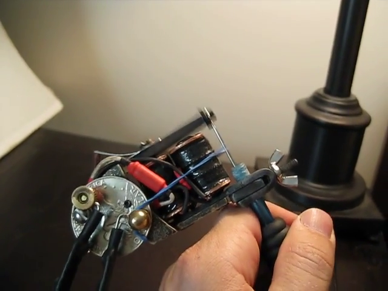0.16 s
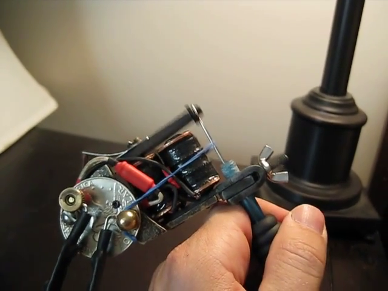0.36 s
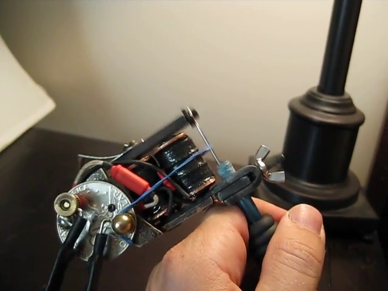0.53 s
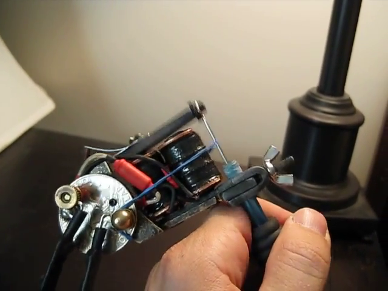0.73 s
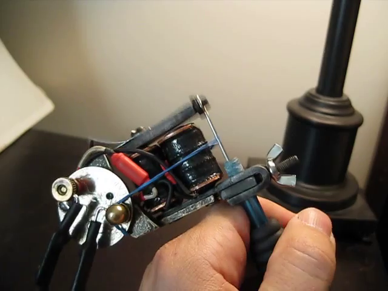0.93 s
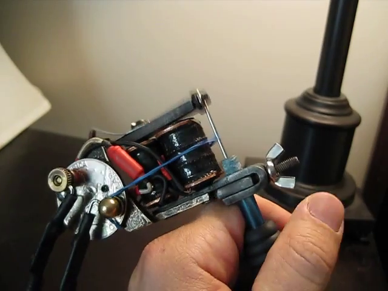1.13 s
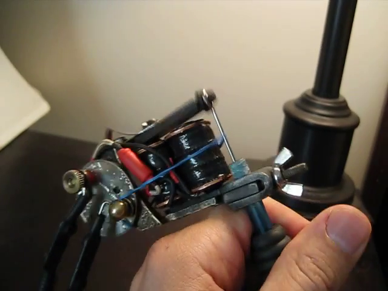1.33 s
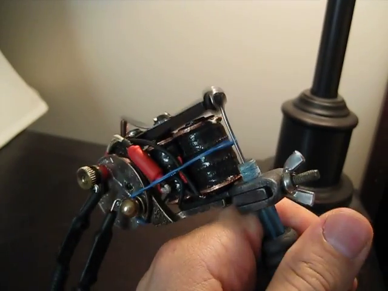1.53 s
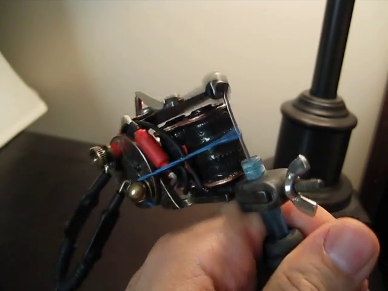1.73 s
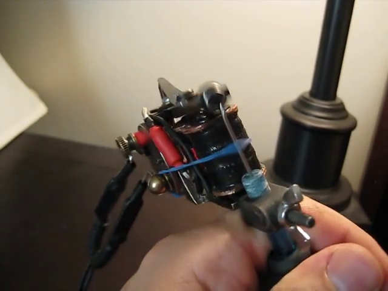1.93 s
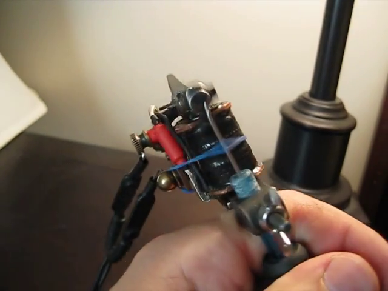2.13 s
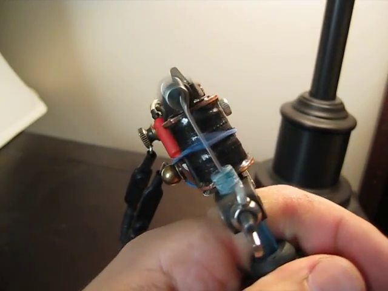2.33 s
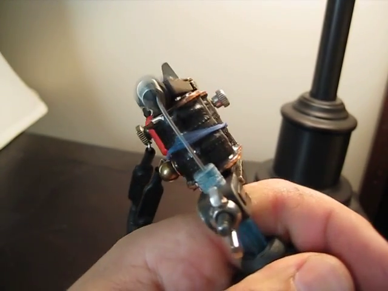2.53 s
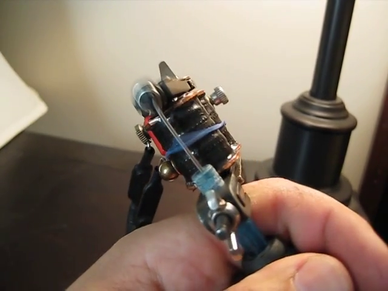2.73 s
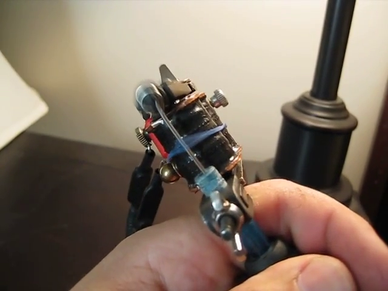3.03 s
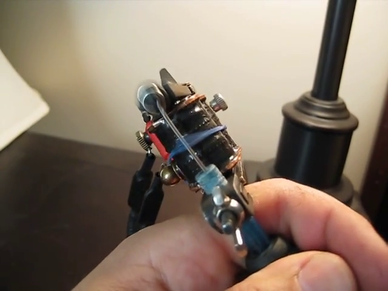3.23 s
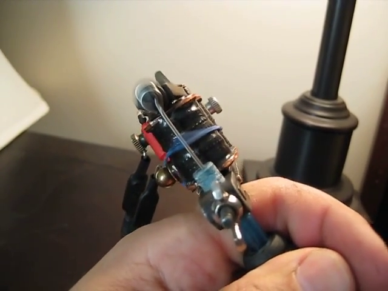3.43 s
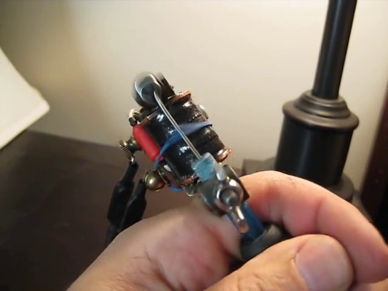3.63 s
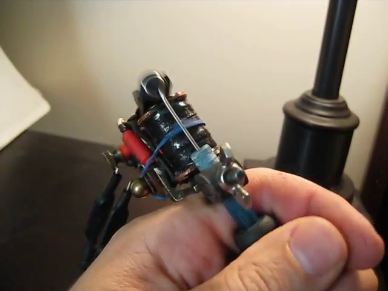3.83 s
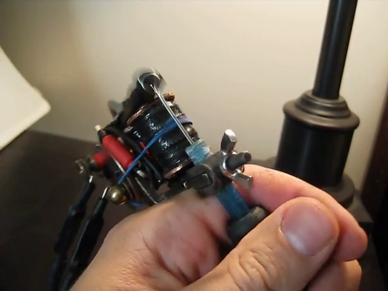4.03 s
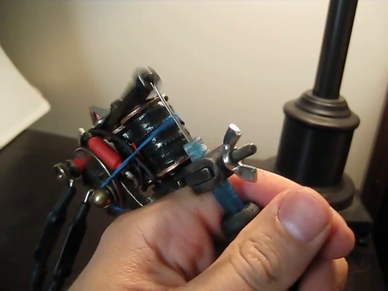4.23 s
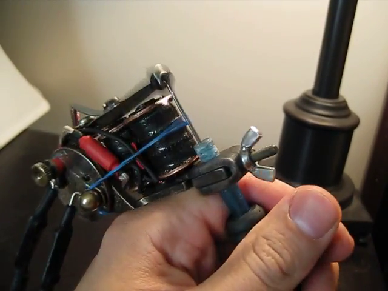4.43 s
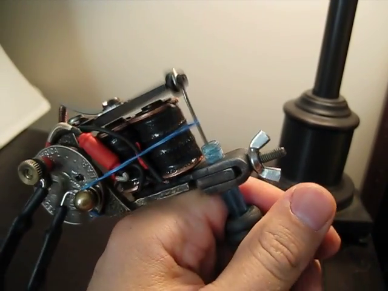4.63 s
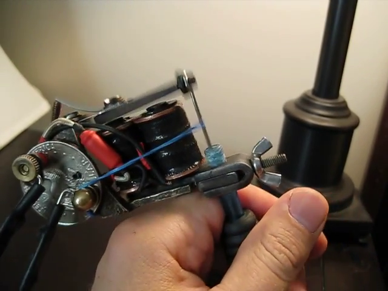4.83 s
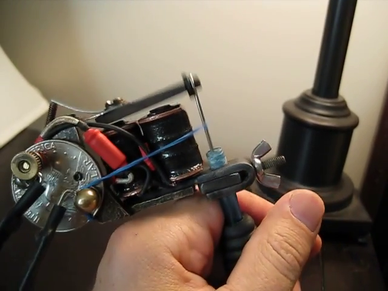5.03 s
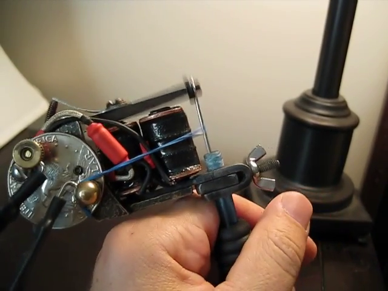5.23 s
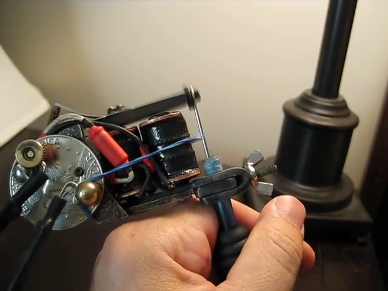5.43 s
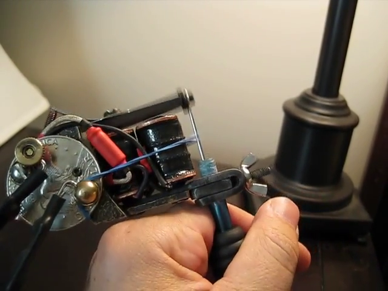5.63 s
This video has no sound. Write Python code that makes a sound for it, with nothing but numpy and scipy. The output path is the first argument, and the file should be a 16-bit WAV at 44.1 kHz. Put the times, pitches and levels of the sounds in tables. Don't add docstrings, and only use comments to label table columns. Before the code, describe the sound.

A coil tattoo machine runs in a hand near a small microphone in a small room. About sixty sharp metal slaps a second fuse into a steady, bright, raspy buzz with little bass. Turning the machine shifts its metallic colour and back again; uneven dull ticks roughen it. At the very end it stops abruptly with a slight clink and short room tail.

```python
import sys
import numpy as np
from scipy import signal
from scipy.fft import rfft, irfft
from scipy.io import wavfile
from scipy.ndimage import uniform_filter1d, map_coordinates

SR = 44100
rng = np.random.default_rng(int(sys.argv[2]) if len(sys.argv) > 2 else 0)


def unload_audio(sound):
    columns = np.transpose(np.atleast_2d(sound))
    steps = np.round(np.clip(columns, -1, 1) * 32767)
    wavfile.write(sys.argv[1], SR, steps.astype(np.int16))


def linear_from_db(decibels):
    return 10 ** (np.asarray(decibels, float) / 20)


N = 311649

# time in seconds, pose 0-3 (face-on, edge-on, face-on again, tipped flat),
# turn in degrees, rebound lag in ms, rebound level in dB.
HAND = [(0, 0, 0, .5, -6), (1.1, 0, 6, .5, -6), (1.5, .4, 30, .55, -8), (1.95, 1, 60, .55, -5),
        (3.6, 1, 66, .55, -5), (4.1, 1.4, 45, .5, -6), (4.6, 2, 15, .5, -6), (5.1, 2, -5, .5, -5),
        (5.5, 2.2, -8, .5, -3), (5.95, 3, -22, .5, 2), (7.07, 3, -24, .5, 2)]
LOW_LEAD_S = .0003
NOTCH_HZ = 7950


def rms_one(x):
    return x / np.sqrt(np.mean(x ** 2) + 1e-20)


def read(rows, s):
    times, *columns = np.transpose(rows)
    return [np.interp(s, times, c) for c in columns]


def by_view(pose, values):
    return np.interp(pose, range(4), values)


def ring(s, size, hz, t60_ms, phase=0):
    w = 2 * np.pi * hz / SR
    at = np.ceil(s * SR).astype(int)
    clicks = np.full(N, 1e-18, complex)
    np.add.at(clicks, at, size * np.exp(1j * (phase + w * (at - s * SR))))
    pole = linear_from_db(-60e3 / (t60_ms * SR)) * np.exp(1j * w)
    return signal.lfilter([1], [1, -pole], clicks).imag


def steep(x, hz, kind):
    return signal.sosfilt(signal.butter(4, hz, kind, fs=SR, output="sos"), x)


def wander(count, size):
    once = uniform_filter1d(rng.standard_normal(count), size=size)
    return rms_one(uniform_filter1d(once, size=size))


def bell(s, centre_s, half_s):
    return np.exp(-((s - centre_s) / half_s) ** 4 / 2)


def strokes():
    # time in seconds, rate in strokes per second.
    stroke_rate = [(0, 61.85), (.35, 61.97), (.65, 62.25), (.9, 61.88), (1.5, 61.92), (1.95, 61.45),
                   (2.55, 62.05), (2.85, 61.8), (3.6, 61.81), (3.9, 61.57), (4.6, 61.18), (4.9, 61.18),
                   (5.1, 61.28), (5.3, 61.19), (6.5, 60.8), (6.97, 60.85)]
    stop_s, first_stroke = 6.975, .523
    s = np.arange(int(stop_s * SR)) / SR
    count = np.cumsum(read(stroke_rate, s)[0]) / SR - first_stroke
    times = np.interp(np.arange(int(count[-1]) + 1), count, s)
    return times + 3e-5 * rng.standard_normal(len(times))


def frame(s):
    # frequency in Hz, t60 in ms, level in dB in the four
    steel = [(2590, 10.4, -30, -39, -30, -27), (3370, 4.5, -28.5, -33, -28, -27),
             (3680, 9, -32, -35, -31.5, -30), (4000, 22, -35.5, -35.5, -37.5, -37.5),
             (4570, 3.4, -26, -26.5, -26, -26), (5570, 7.15, -25, -55, -25, -21.5),
             (6160, 3.6, -26, -27.5, -27, -23), (7040, 3.36, -24.5, -14.5, -22.5, -25),
             (9066, 5.6, -19, -22, -19.5, -15), (9350, 1.34, -16, -44, -30, -20),
           (9960, 41, -30, -20.5, -30, -53), (10720, 1.17, -16.5, -11.5, -11, -12),
           (10836, 10.5, -13.5, -19, -11.5, -11), (11342, 8.4, -20.5, -11.5, -18.5, -14),
           (11950, 6.1, -22.5, -10, -16.5, -30), (12080, 1.93, -8, -6, -11, -16.5),
           (15460, 0.97, -15.5, -16, -25, -21), (13700, 1.6, -52, -36, -12, -18),
           (16400, 1, -4, -12.5, -5.5, -25), (16040, 3.4, -7, -58, -7, -21),
           (17600, 0.88, -9.5, -17, -13, -9.5)]
    tremor_deg, radiator_m, rebound_jitter_s = 5, .005, 3e-6
    mode_spread_db, drift_db, phase_spread_rad = .7, 1.5, .08
    broad_t60_share = .72

    pose, turn_deg, lag_ms, rebound_db = read(HAND, s)
    turn_deg = turn_deg + tremor_deg * wander(count=len(s), size=12)
    lowest_db, middle_db = swell(s, pose)
    blow_db = rng.normal(0, 0.8, len(s))
    rebound = s + lag_ms / 1000 + rebound_jitter_s * rng.standard_normal(len(s))
    groups = np.zeros((2, N))
    for k, (hz, t60_ms, *view_db) in enumerate(steel):
        low = int(hz < NOTCH_HZ)
        swell_db = low * (lowest_db if hz < 4500 else middle_db)
        db = by_view(pose, view_db) + blow_db + rng.normal(0, mode_spread_db, len(s))
        db = db + swell_db - np.mean(swell_db) + drift_db * wander(count=len(s), size=15)
        if t60_ms < 7:
            t60_ms, db = t60_ms * broad_t60_share, db + 4.5
        offset_m = rng.uniform(-1, 1) * radiator_m
        path_m = offset_m * np.sin(np.radians(turn_deg))
        phase = np.pi * k + 2 * np.pi * hz * path_m / 343
        phase = phase + rng.normal(0, phase_spread_rad, len(s))
        light_db = db + rebound_db - 12 * low
        blows = np.r_[s, rebound] - low * LOW_LEAD_S
        groups[low] += ring(blows, linear_from_db(np.r_[db, light_db]), hz, t60_ms, np.r_[phase, phase])
    high = steep(groups[0], NOTCH_HZ, "high")
    low = steep(steep(groups[1], NOTCH_HZ, "low"), 1970, "high")
    return high + low + grip_hum(s, pose, blow_db)


def swell(s, pose):
    # time in seconds, half length in seconds, lowest modes in dB, middle modes in dB.
    sweeps = [(.85, 0.1, -2, -1.5), (1.31, 0.19, 3, 1.5), (1.82, 0.044, 4, 1), (3.76, 0.17, 5.5, 1.5),
              (4.13, 0.046, 5, 4.5), (4.578, 0.11, 0.5, -3), (5.06, 0.043, 8.5, 3.5)]
    lowest_view_db = [0, 3, -3, 3.5]
    middle_view_db = [0.22, -0.1, -1.1, .5]
    lowest_db, middle_db = by_view(pose, lowest_view_db), by_view(pose, middle_view_db)
    for at, half_s, low_db, mid_db in sweeps:
        passing = bell(s, at, half_s)
        lowest_db = lowest_db + low_db * passing
        middle_db = middle_db + mid_db * passing
    return lowest_db, middle_db


def grip_hum(s, pose, blow_db):
    # frequency in Hz, t60 in ms, level in dB in the four views.
    grip = [(492, 58, -72, -83, -65, -63), (600, 84, -67, -67, -75, -62.5), (966, 14, -52, -56, -54, -49),
            (1357, 16.4, -52, -48, -52, -46.5), (2010, 26, -71, -84, -51, -52)]
    return sum(ring(s, linear_from_db(by_view(pose, view_db) + blow_db), hz, t60_ms)
               for hz, t60_ms, *view_db in grip)


def side_plates(s):
    # frequency in Hz, t60 in ms, level in dB.
    oblique = [(3280, 5.6, -25), (4930, 21, -39)]
    slant = np.abs(np.sin(np.pi * np.minimum(read(HAND, s)[0], 2)))
    return sum(ring(s - LOW_LEAD_S, -slant * linear_from_db(db), hz, t60_ms) for hz, t60_ms, db in oblique)


def small_contacts(s):
    # share of stroke, frequency in Hz, t60 in ms, level in dB.
    spring_tick = (2.6, 3412, 21, -69)
    # time in seconds, frequency in Hz, t60 in ms, level in dB.
    last_touch = [(6.982, 3190, 22, -30.5), (6.982, 3240, 150, -45.5), (6.981, 844, 20, -37),
                  (6.982, 2050, 13, -33), (6.992, 386, 83, -47), (7.001, 930, 20, -39)]
    share, hz, t60_ms, db = spring_tick
    closing = s[:-1] + np.diff(s) * (share + rng.normal(0, 0.017, len(s) - 1))
    ticks = ring(closing, linear_from_db(db + rng.normal(0, 1, len(closing))), hz, t60_ms)
    return ticks + sum(ring(np.array([at]), linear_from_db(db), hz, t60_ms) for at, hz, t60_ms, db in last_touch)


def overload_tick(s):
    # time in seconds, lean -1..1, slap-to-slap scatter.
    lean_curve = [(0, -0.47, 0.4), (.7, 0.43, 0.49), (.95, -0.032, 0.37), (1.3, 0.31, 0.45),
                  (1.5, 0.53, 0.17), (2.0, .55, 0.37), (2.3, -0.19, 0.24), (3.4, -0.28, 0.37),
                  (3.85, -0.15, 0.19), (4.15, -0.15, 0.46), (4.4, 0.4, 0.26), (4.8, -0.077, 0.27),
                  (5.3, -0.3, 0.48), (5.65, -0.24, 0.25), (5.85, 0.074, 0.25), (7, 0.36, 0.23)]
    # time in seconds, half length in seconds, lean.
    spells = [(0.032, 0.025, .1), (0.829, 0.041, 0.1), (1.707, 0.038, -0.07), (1.828, 0.065, 0.94),
              (2.163, 0.053, -0.17), (2.277, .01, -0.79), (2.565, 0.012, -1.6), (2.754, .06, 0.052),
              (2.973, 0.07, 0.077), (3.086, 0.0079, -0.85), (3.337, 0.042, -0.12), (3.446, 0.022, -0.7),
              (4.12, 0.025, -0.66), (1.108, 0.0089, 0.97), (1.97, .015, 0.95), (0.543, 0.013, 0.45),
              (4.5, 0.018, 1.13), (4.668, .06, 0.11), (5.067, 0.038, 0.76), (5.718, 0.024, 0.2),
              (6.118, 0.056, 0.1), (6.856, .01, 0.93)]
    full_tick_db, settled_scatter = -3.5, 0.39
    lean, scatter = read(lean_curve, s)
    chance = 1.36 * np.tanh(1.64 * rng.standard_normal(len(s)))
    size = lean + np.abs(scatter) * chance
    for at, half_s, settled in spells:
        held = bell(s, at, half_s)
        size = (1 - held) * size + held * settled * (1 + settled_scatter * chance)
    clicks = np.zeros(N)
    clicks[((s + .0003) * SR).astype(int)] = size * linear_from_db(full_tick_db)
    return signal.sosfilt(signal.butter(2, 3500, fs=SR, output="sos"), clicks)


def surroundings(x):
    # delay in ms, level in dB in the four views.
    echoes = [(1.5, -14, -20, -15, -18), (2.3, -15, -18, -15, -13), (3.1, -15, -14, -15, -11),
              (4.1, -17, -21, -16, -21), (6.5, -13, -23, -15, -16), (8.3, -21, -19, -16, -21),
              (11.3, -21, -23, -20, -21)]
    room_db = [-8.5, -20.5, -12.5, -15]
    room_t60_s, room_onset_s = 0.55, 0.0039
    pose_shift_ms, sway_ms = .25, .012
    now = np.arange(N)
    pose = read(HAND, now / SR)[0]
    out = x.copy()
    steps = N // 1000 + 2
    for delay_ms, *view_db in echoes:
        shift = pose_shift_ms * by_view(pose, rng.uniform(-1, 1, 4))
        sway = sway_ms * np.interp(now / 1000, np.arange(steps), wander(count=steps, size=10))
        lag = (delay_ms + shift + sway) * SR / 1000
        out += linear_from_db(by_view(pose, view_db)) * map_coordinates(x, [now - lag], order=3)
    age = np.arange(SR // 2) / SR
    decay = linear_from_db(-60 * age / room_t60_s) * (1 - np.exp(-age / room_onset_s))
    for view in range(4):
        share = np.sqrt(np.clip(1 - abs(pose - view), 0, 1))
        tail = decay * rng.standard_normal(len(age))
        tail = tail / np.linalg.norm(tail)
        out += linear_from_db(room_db[view]) * signal.fftconvolve(x * share, tail)[:N]
    return out


def floor():
    # frequency in Hz, density in dB per Hz.
    floor_curve = [(30, 5.5), (60, 3.5), (300, 5), (900, 4), (1700, 9), (3300, 14), (6000, 11), (11000, 5),
                   (17000, -41)]
    hz = np.maximum(np.fft.rfftfreq(N, 1 / SR), 10)
    knot_hz, knot_db = np.transpose(floor_curve)
    shape = linear_from_db(np.interp(np.log(hz), np.log(knot_hz), knot_db))
    return linear_from_db(-51) * rms_one(irfft(rfft(rng.standard_normal(N)) * shape, N))


def scene():
    # time in seconds, slap level in dB.
    nearness = [(0, -28.5), (.9, -27.5), (1.25, -26.5), (1.65, -26.5), (2.15, -28.5), (2.55, -26),
                (2.8, -28.5), (3.25, -27), (3.85, -29.5), (4.15, -26.5), (4.5, -27.5), (5.35, -29.5),
                (6.0, -27.5), (6.5, -27.5), (6.97, -28)]
    s = strokes()
    buzz = surroundings(frame(s) + small_contacts(s) + side_plates(s))
    level = np.sqrt(uniform_filter1d(buzz ** 2, size=5720))[(s * SR).astype(int)]
    gain = linear_from_db(read(nearness, s)[0] + 4.0) / level
    buzz = buzz * np.interp(np.arange(N) / SR, s, gain)
    return (buzz + overload_tick(s) + floor())[None]


def roll_off(x):
    return signal.sosfilt(signal.butter(12, 20240, fs=SR, output="sos"), x)


def record(dry):
    # start in seconds, end in seconds.
    top_open = [(.82, .98), (1.83, 1.86), (1.94, 2.21), (2.38, 2.43), (2.5, 2.58), (2.66, 2.74),
                (2.78, 2.85), (2.89, 3.06), (3.43, 3.47), (3.73, 3.79)]
    notch_width_hz, notch_db = 1300, -19
    cutoff_hz, top_hz = 17300, 20100
    w, width = 2 * np.pi * NOTCH_HZ / SR, np.tan(np.pi * notch_width_hz / SR)
    deep = width * linear_from_db(notch_db)
    x = signal.lfilter([1 + deep, -2 * np.cos(w), 1 - deep], [1 + width, -2 * np.cos(w), 1 - width], dry)
    hz, s = np.fft.rfftfreq(N, 1 / SR), np.arange(N) / SR
    spectrum = rfft(x)
    body = irfft(spectrum * (hz < cutoff_hz), N)
    top = irfft(spectrum * (hz >= cutoff_hz) * (hz < top_hz), N)
    is_open = sum((s > a) * (s < b) for a, b in top_open).astype(float)
    is_open = uniform_filter1d(is_open, size=400)
    return roll_off(body + linear_from_db(-13) * is_open * top)


dry = scene()
out = record(dry)
unload_audio(out)
```